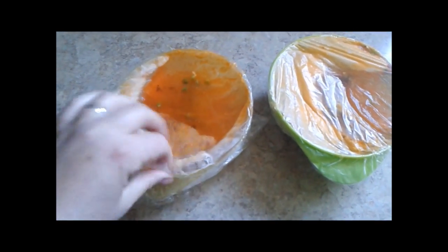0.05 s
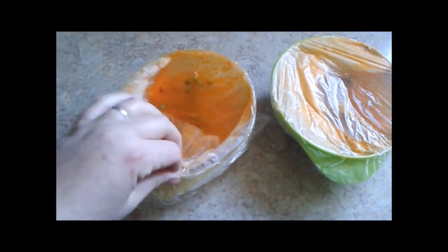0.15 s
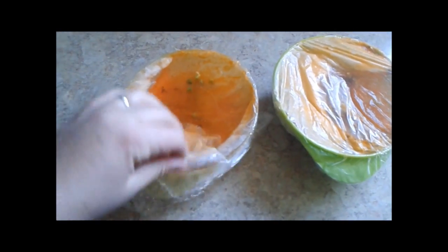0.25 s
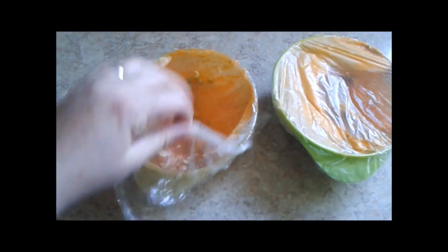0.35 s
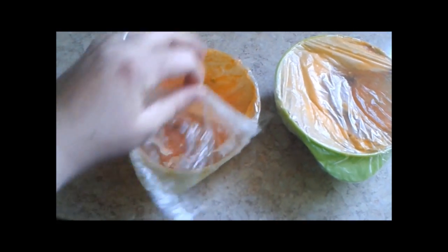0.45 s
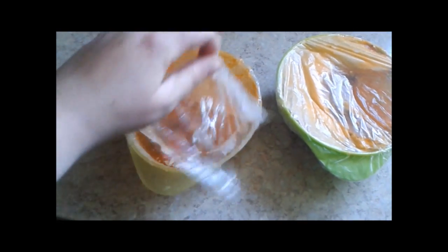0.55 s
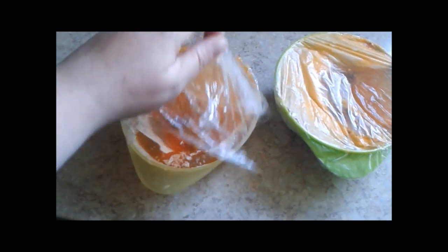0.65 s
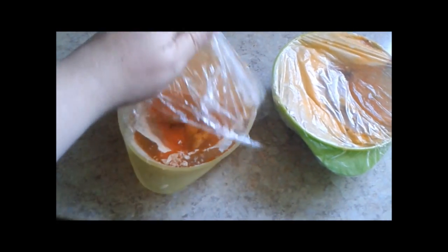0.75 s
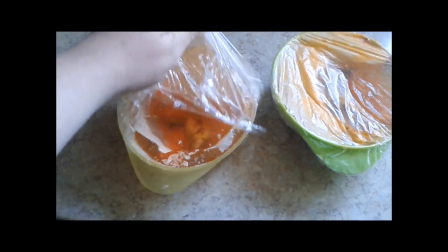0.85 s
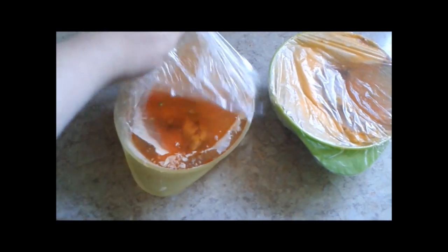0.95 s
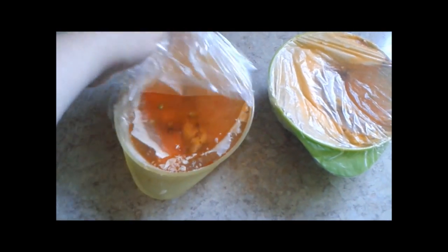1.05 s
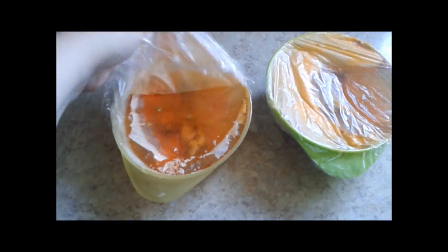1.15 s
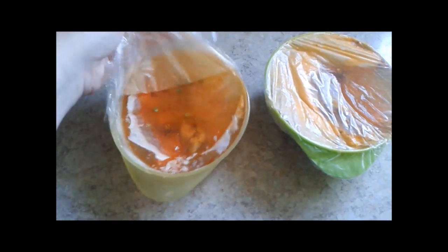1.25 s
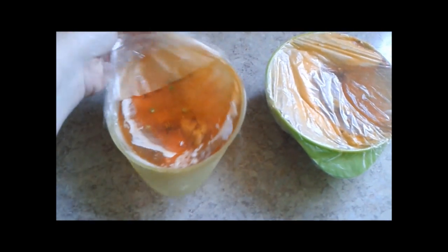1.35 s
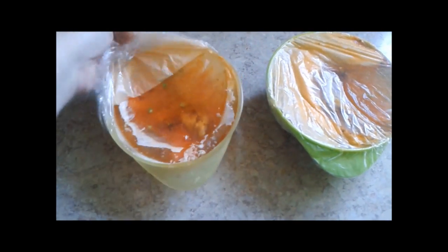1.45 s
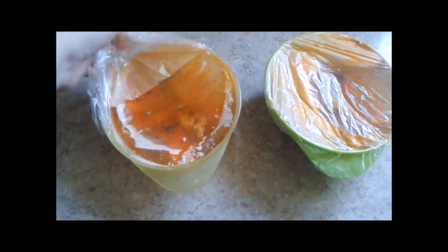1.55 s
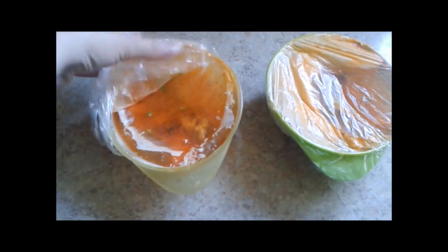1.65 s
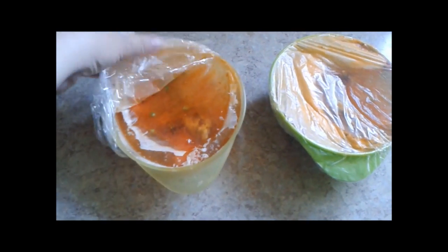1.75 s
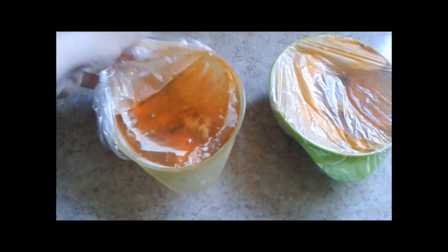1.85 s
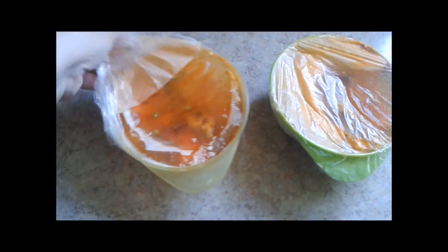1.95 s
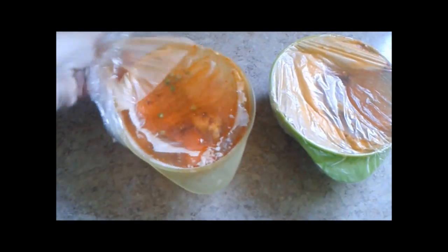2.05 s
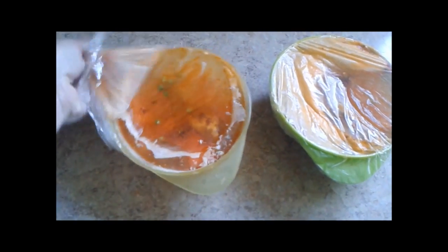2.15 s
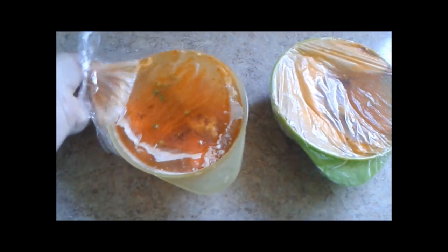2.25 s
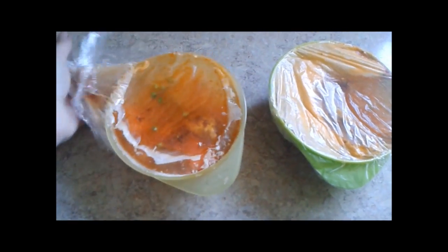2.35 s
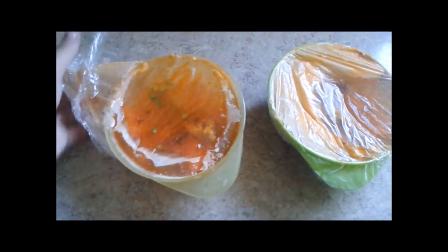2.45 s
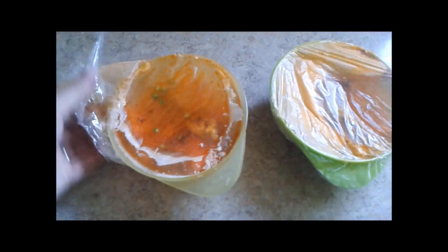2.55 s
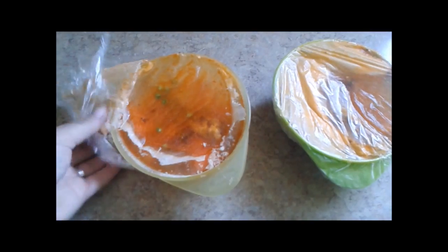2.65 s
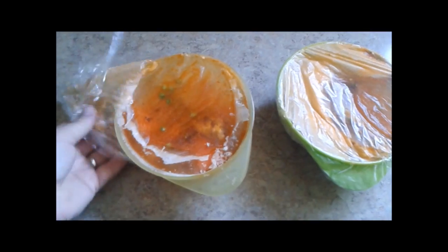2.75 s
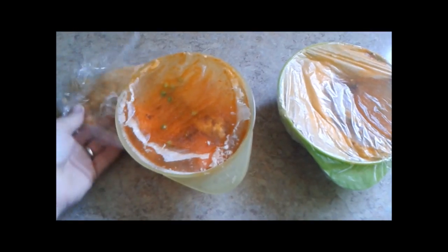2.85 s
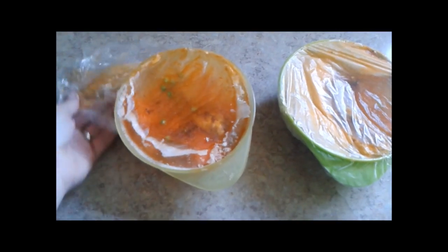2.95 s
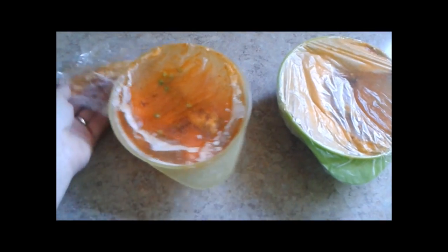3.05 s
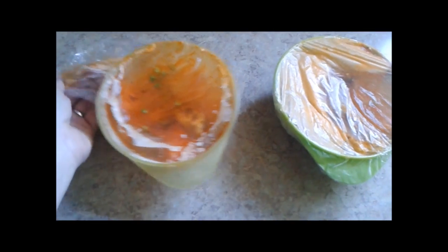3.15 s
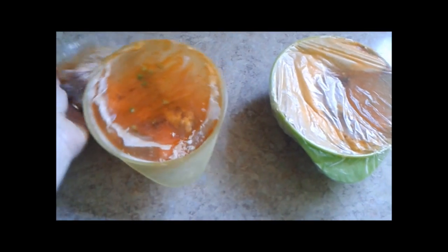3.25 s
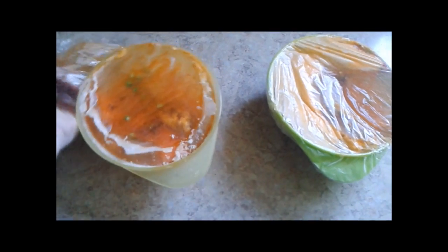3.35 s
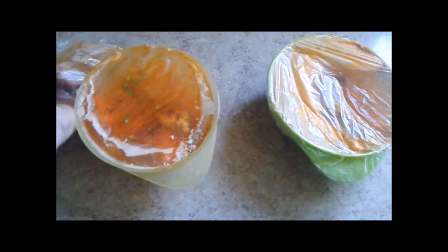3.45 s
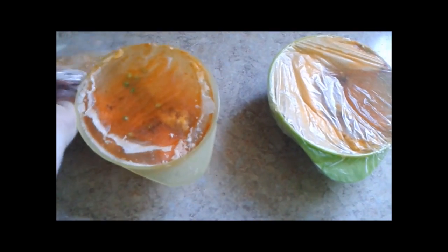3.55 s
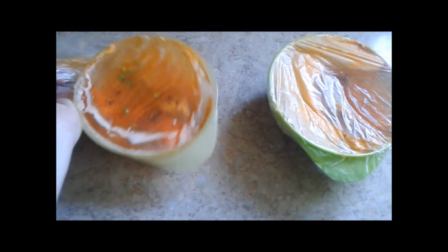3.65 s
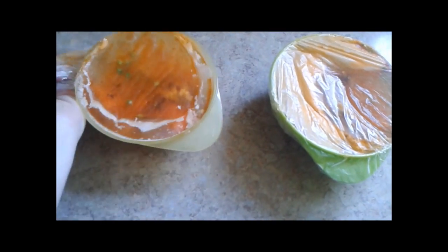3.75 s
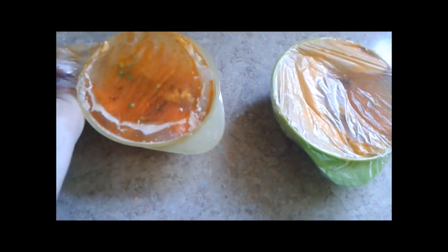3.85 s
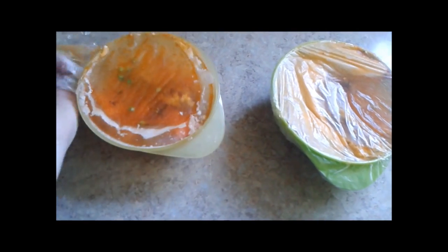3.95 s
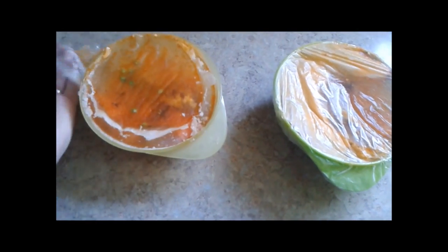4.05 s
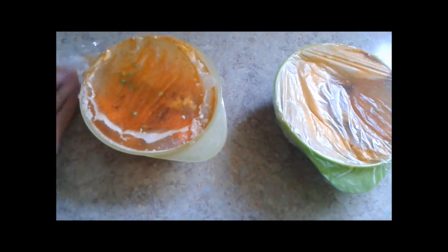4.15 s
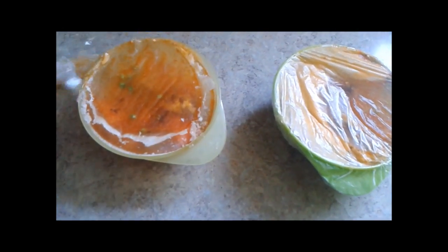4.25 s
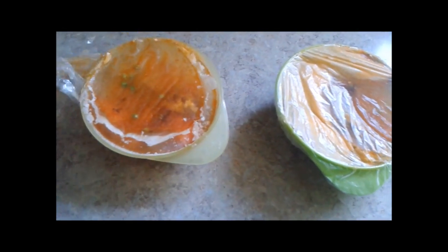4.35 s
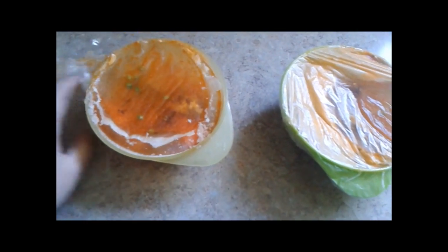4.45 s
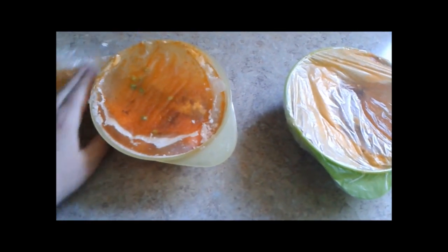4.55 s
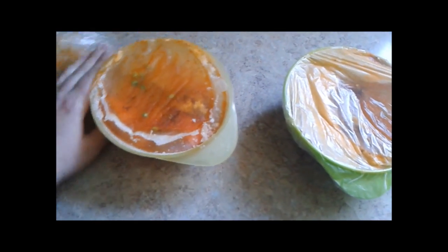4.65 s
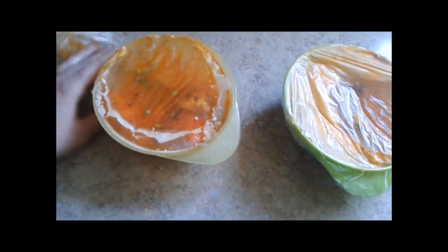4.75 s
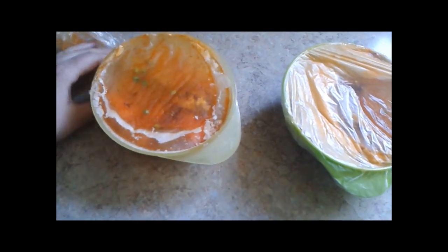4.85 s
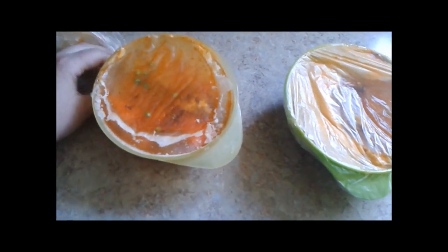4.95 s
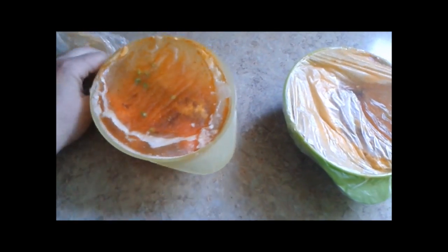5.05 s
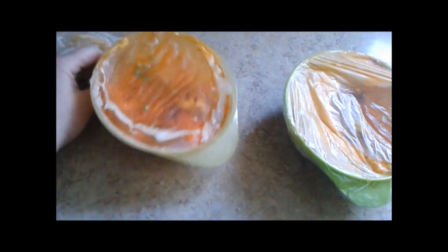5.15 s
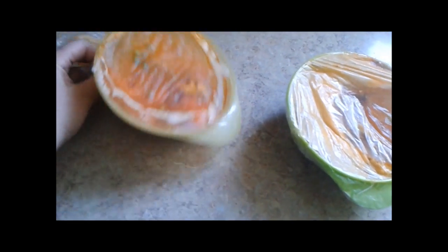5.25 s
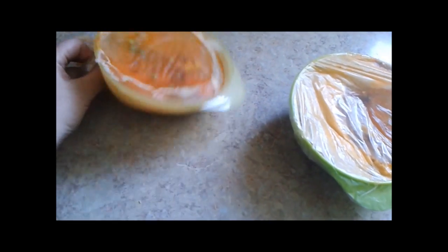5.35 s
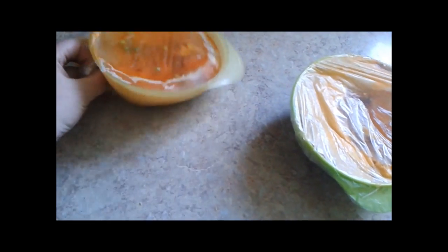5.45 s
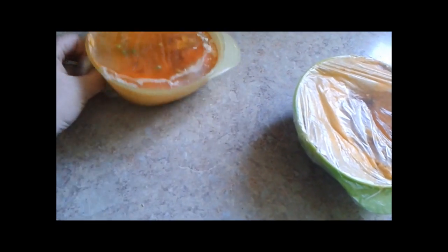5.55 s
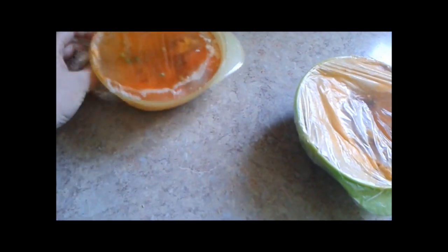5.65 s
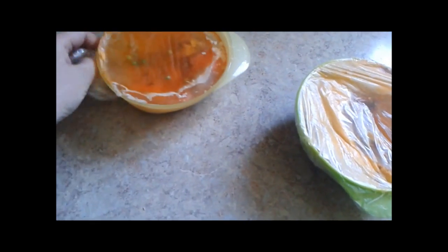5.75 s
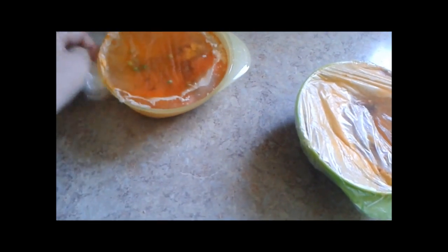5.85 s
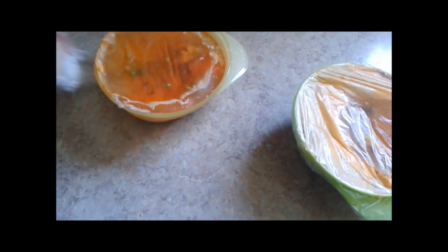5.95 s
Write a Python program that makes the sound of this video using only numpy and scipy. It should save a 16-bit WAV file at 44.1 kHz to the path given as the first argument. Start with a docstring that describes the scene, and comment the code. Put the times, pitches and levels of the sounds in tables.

```python
"""Small kitchen, one microphone close to a plastic tub of soup; an appliance hums faintly throughout.
From the start cling film is pulled over the tub and tucked round its side: thousands of tiny creases
buckle into a rustle, with single louder snaps. Now and then the tub bumps softly on the counter, and
the film rings higher as it tightens. Near the end the snaps crowd together, and the tub, having been
lifted, is set down with a hard knock."""
import sys
import numpy as np
from scipy import signal
from scipy.fft import rfft, irfft
from scipy.io import wavfile
from scipy.ndimage import uniform_filter1d

SR = 44100
rng = np.random.default_rng(int(sys.argv[2]) if len(sys.argv) > 2 else 0)


def pcm_store(signal):
    """Save signal as 16-bit PCM."""
    levels = np.round(np.clip(np.atleast_2d(signal), -1, 1) * 32767)
    wavfile.write(sys.argv[1], SR, levels.astype(np.int16).T)


N = 264584

# room tone spectrum: f/Hz, relative level/dB
ROOM_TONE = [(25, -24), (60, -10.5), (100, -10.5), (150, -6.5), (220, -3.5), (330, -1.5), (500, -4.5),
             (1000, -10), (4000, -10.5), (15000, -21)]
# the hand draws the film along: t/s, swell/s, hold/s, level/dB, slack folds/dB, taut sizzle/dB
PULLS = [(0.063, .015, 0.023, -38, -4.5, 2), (0.195, 0.041, .02, -44.5, -8, 5),
         (0.243, 0.089, .15, -30, -2.5, 5.5), (0.499, .02, 0.08, -31, 1, 0), (0.628, .03, 0.15, -34, 0, 2),
         (0.868, 0.012, 0.055, -44, 0, 6), (0.91, 0.07, 0.079, -31, -3, 2),
         (1.052, 0.046, 0.067, -29.5, 1, 2), (1.207, 0.023, .015, -29, -3.5, 1.5),
         (1.284, 0.0035, 0.048, -31.5, -4, 0.5), (1.358, 0.077, 0.013, -31.5, -4, 0),
         (1.497, .02, 0.25, -41, 0, -2.5), (1.72, .04, 0.08, -34.5, -5, 0.5),
         (1.85, .015, 0.079, -33, -1, -1), (1.941, .04, 0.17, -30.5, -4, 1),
         (2.253, .06, .04, -34.5, 3.5, 2.5), (2.385, 0.011, .02, -40, 4.5, 3),
         (2.47, .02, .07, -49.5, 5, 3), (2.638, .04, .08, -38, 3.5, 1), (2.768, 0.036, .12, -35, 3.5, 4.5),
         (2.927, .04, .28, -36, 3.5, -1.5), (3.246, 0.082, 0.022, -32, 3, 2.5),
         (3.363, 0.026, .04, -35, 1.5, -0.5), (3.485, 0.081, 0.011, -34.5, 4, 2),
         (3.649, 0.035, 0.25, -43, 2.5, -2.5), (3.928, 0.061, 0.23, -38.5, 3.5, -1.5),
         (4.426, 0.0089, .03, -44.5, 4.5, -8), (4.465, 0.098, .26, -37.5, 2.5, -3.5),
         (4.777, 0.23, 0.013, -31, -2, 2), (5.038, 0.027, .09, -34, 2, -2),
         (5.189, 0.0103, 0.55, -35, 1, -2), (5.619, .04, 0.18, -31.5, -3, -0.5),
         (5.893, 0.025, .1, -43.5, -26, 2)]
# a patch of film comes unstuck in one short crunch: t/s, level/dB, slack folds/dB
CRUNCHES = [(0.0, -37.5, 2), (0.25, -37.5, 4), (1.637, -34.5, -5), (1.961, -25.5, -4.5), (2.175, -27, 0),
            (2.555, -35, 0.5), (2.799, -35.5, 7), (3.035, -31.5, 6.5), (3.196, -32, -1), (3.571, -35.5, -2),
            (3.805, -43, 13), (5.075, -32.5, 2), (5.679, -27.5, 7)]
# spectrum of the buckling film: f/Hz, relative level/dB
FILM_COLOUR = [(350, -14.5), (520, -18), (700, -11.5), (1000, -12), (1400, -7), (2100, -6), (2800, -3),
               (3800, 1.23), (4700, 2), (6000, -4), (7400, -13), (8800, -17), (10500, -22.5), (15500, -21)]
# the film's main resonance rises as it is pulled tight: t/s, f/Hz, prominence/dB
FILM_RESONANCE = [(0, 3600, -1), (1.3, 3870, 3.5), (2.2, 4330, 1.5), (3.3, 4830, 2.5), (6, 4730, 6)]
# large creases letting go, with a few creaks of the tub wall (3.42, 5.28, 5.33, 5.50 s) and a click of the tub
# (5.65 s): t/s, relative level/dB, hollow part/dB, sharp part/dB
SNAPS = [(0.012, -24.5, -0.5, -15), (0.0651, -25, -2, 0), (0.273, -21, -13, -2), (0.324, -20, 17, -7),
         (0.452, -17, -18, 3), (0.811, -19.5, -5, 0), (0.946, -20, 2, 0), (1.2884, -16, -4, -9),
         (2.114, -20, 6, 12), (3.346, -23, 0, 0), (3.4187, -22, 26, -3), (3.5821, -15.5, 1, -17),
         (3.605, -19, 1, 0), (4.426, -34, -6, 0), (4.771, -24, -15, -3), (4.932, -23, -8, -9),
         (5.098, -21, 11, -9), (5.195, -13.5, 2, -15), (5.249, -13, 6, -7), (5.282, -15.5, 28, 5),
         (5.301, -15, -11, -8), (5.333, -17, 17.5, -7), (5.4085, -11, -7, 4), (5.417, -20.5, 21, -3),
         (5.457, -22, -7, -1), (5.5015, -17, 7, -4), (5.548, -18, -11, -15), (5.646, -6.5, 0.5, -7)]
# tub against counter: t/s, strength/dB, low cut/Hz, high cut/Hz, drag/s
KNOCKS = [(0.196, -23, 208, 704, 0.016), (2.066, -25, 200, 503, 0.014), (2.089, -21.5, 280, 700, 0.022),
          (2.297, -26.5, 151, 320, 0.024), (3.234, -25.5, 170, 320, 0.013), (3.369, -26, 260, 600, 0.012),
          (4.332, -36, 130, 320, 0.043), (4.509, -33, 170, 320, 0.014), (4.651, -23, 277, 850, 0.014),
          (5.11, -24.5, 260, 745, 0.015), (5.6462, -20, 248, 890, 0.0018),
          (5.7279, -1.5, 39.5, 12100, 0.00071), (5.7428, -2.5, 59.4, 392, 0.0069)]
# ringing of the full tub and the counter under it: f/Hz, relative level/dB, t60/s
TUB_MODES = [(128.5, -29.5, 0.23), (171.8, -30, 0.35), (201, -26.5, 0.16), (262.7, -29.5, 0.24),
             (328.6, -31.5, 0.28), (348, -29.5, 0.29), (418.6, -32, 0.38), (462, -28.5, 0.21),
             (600, -26, 0.011), (681, -33.5, 0.19), (830, -25.5, 0.043), (990, -20.5, 0.028),
             (1350, -25, 0.03), (1620, -16.5, .022), (1846, -7.5, 0.014), (2200, -20, 0.044),
             (3630, -14.5, 0.029), (4440, -2, 0.017), (4920, -4.5, 0.019), (5050, -36, 0.009),
             (8650, -13.5, 0.013)]
BAND_EDGES_HZ = 350 * 2 ** (np.arange(23) / 3.97)   # about a quarter octave apart
BAND_CENTRES_HZ = np.sqrt(BAND_EDGES_HZ[1:] * BAND_EDGES_HZ[:-1])


def from_db(db):
    """Decibels to gain."""
    return 10 ** (np.asarray(db) / 20)


def unit_rms(x):
    """Scale to unit power."""
    return x / np.sqrt(np.mean(x ** 2) + 1e-20)


def in_time(rows):
    """Each column of a curve, sample by sample."""
    times, *columns = np.transpose(rows)
    return [np.interp(np.arange(N) / SR, times, column) for column in columns]


def at_hz(points, hz):
    """Read a spectrum on a log-frequency axis."""
    f, values = np.transpose(points)
    return np.interp(np.log(np.maximum(hz, 1)), np.log(f), values)


def filtered(x, hz, kind, order=2):
    """Causal Butterworth filter."""
    sos = signal.butter(order, np.clip(hz, 10, .45 * SR), kind, fs=SR, output="sos")
    return signal.sosfilt(sos, x + 1e-18)


def drift(per_s):
    """A smooth random wander of unit power."""
    knots = rng.standard_normal(8192)
    return unit_rms(np.interp(np.arange(N) / SR * per_s, np.arange(len(knots)), knots))


def ring(clicks, hz, t60):
    """A unit click sets a sine of height 1 ringing."""
    r, w = np.exp(-np.log(1000) / (t60 * SR)), 2 * np.pi * hz / SR
    return signal.lfilter([0, np.sin(w)], [1, -2 * r * np.cos(w), r * r], clicks + 1e-18)


def room_tone(level_db=-55.0, rumble_hz=130, rumble_db=-3.5, waver_db=5.0):
    """The bed under everything: steady air above a wavering rumble."""
    colour = from_db(at_hz(ROOM_TONE, np.fft.rfftfreq(N, 1 / SR)))
    air = unit_rms(irfft(rfft(rng.standard_normal(N)) * colour, N))
    rumble = from_db(rumble_db + waver_db * drift(6.6)) * filtered(air, rumble_hz, "low", order=4)
    return from_db(level_db) * (filtered(air, rumble_hz, "high", order=4) + rumble)


def appliance_hum(hz=320, t60=0.054, level_db=-64.0):
    """An appliance, faint at the microphone: noise keeps one resonance humming roughly."""
    hum = unit_rms(ring(rng.standard_normal(N), hz, t60))
    return from_db(level_db) * filtered(hum, 200, "high")


def stroke(start_s, swell_s, hold_s, release_db_per_s):
    """Gain of one movement of the film: it swells, holds, and the creases settle as the hand stops."""
    t = np.arange(N) / SR - start_s
    rise = np.clip(t / max(swell_s, .001), 0, 1)
    return rise * from_db(-release_db_per_s * np.clip(t - swell_s - hold_s, 0, 1))


def handling(rest_db=-65.5, crunch_taut_db=-1):
    """Pulls and crunches add in power, the stronger lending its colour: effort/dB, slack/dB, taut/dB."""
    moves = [(stroke(s, swell, hold, release_db_per_s=147), db, slack, taut)
             for s, swell, hold, db, slack, taut in PULLS]
    moves += [(stroke(s, swell_s=0.015, hold_s=0.015, release_db_per_s=259.5), db, slack, crunch_taut_db)
              for s, db, slack in CRUNCHES]
    total = from_db(rest_db) ** 2   # film left alone still ticks faintly
    slack_sum, taut_sum = 0, 0
    for shape, db, slack_db, taut_db in moves:
        power = (from_db(db) * shape) ** 2
        total += power
        slack_sum += power * slack_db
        taut_sum += power * taut_db
    return 10 * np.log10(total), slack_sum / total, taut_sum / total


def crease_colour(hz, slack_db, taut_db):
    """Slack folds add a hollow middle to the film's own colour, taut ones add treble."""
    hollow = at_hz([(450, 0.098), (1250, 0.87), (2100, 0.76), (3200, 0.088)], hz)
    treble = at_hz([(6000, 0.21), (10000, 1)], hz)
    return from_db(at_hz(FILM_COLOUR, hz) + hollow * slack_db + treble * taut_db)


def film_rustle(creases_per_s=4200, clump_db=2.0, colour_db=1.5, fold_db=1.86, gain_db=0.63):
    """Close up, creases buckle in little avalanches, more as the film is worked harder."""
    effort_db, slack_db, taut_db = handling()
    effort_db += 0.46 * drift(per_s=70)   # the hand is unsteady
    resonance_hz, prominence_db = in_time(FILM_RESONANCE)
    rate = creases_per_s * from_db(0.76 * (effort_db - effort_db.mean()))
    at = np.flatnonzero(rng.random(N) < rate * from_db(clump_db * drift(per_s=260)) / SR)
    sizes = np.zeros(N)
    sizes[at] = from_db(np.minimum(rng.exponential(1, N)[at], 4.5))
    # the hand sets the power, however many creases share it
    sizes /= np.sqrt(uniform_filter1d(sizes ** 2, size=900) + 1e-6)
    rustle, neutral = 0, 0
    for k, hz in enumerate(BAND_CENTRES_HZ):
        # each crease has its own colour
        shares = unit_rms(from_db(colour_db * rng.standard_normal(N)[at]))
        clicks = np.zeros(N)
        clicks[at] = sizes[at] * shares * np.sign(rng.random(N)[at] - .5)
        band = filtered(clicks, BAND_EDGES_HZ[k:k + 2], "band")
        # folds open and close, so their resonances come and go
        band *= from_db(fold_db * drift(per_s=14))
        octaves_off = np.log2(hz / resonance_hz)
        band *= from_db(prominence_db * np.exp(-(octaves_off / 0.13) ** 2))
        rustle += band * crease_colour(hz, slack_db, taut_db)
        neutral += band * crease_colour(hz, 0, 0)
    return filtered(rustle / np.std(neutral) * from_db(effort_db + gain_db), 540, "high")


def snaps_and_creaks(slip_s=0.0011, shiver=0.45, shiver_s=0.0072, gain_db=-8.5, size=2048):
    """A large crease lets go near the microphone, or the tub wall creaks or clicks: a quick run of slips, then
    a faint shiver."""
    snaps, t = np.zeros(N + size), np.arange(size) / SR
    for s, db, hollow_db, sharp_db in SNAPS:
        push = rng.standard_normal(size) * (np.exp(-t / slip_s) + shiver * np.exp(-t / shiver_s))
        gains = crease_colour(np.linspace(0, SR / 2, size // 2 + 1), hollow_db, sharp_db)
        # each snap answers causally: minimum phase from the folded cepstrum
        cepstrum = 2 * irfft(np.log(gains)) * (np.arange(size) < size // 2)
        response = np.exp(rfft(cepstrum))
        snap = filtered(irfft(rfft(push) * response), 610, "high")
        at = int(s * SR)
        snaps[at:at + size] += from_db(db + gain_db) * snap / np.std(snap[t < .002])
    return snaps[:N]


def tub_knocks(scatter_db=1.5, drag_grip=0.052, size=4096):
    """Tub on counter: each knock rings the same modes; a light touch reaches few and drags briefly."""
    blows, t = np.zeros((len(KNOCKS), N)), np.arange(size) / SR
    for blow, (s, db, low_cut_hz, high_cut_hz, drag_s) in zip(blows, KNOCKS):
        push = (t == 0) + drag_grip * rng.standard_normal(size) * np.exp(-t / drag_s)
        softened = filtered(push, high_cut_hz, "low", order=3)
        at = int(s * SR)
        blow[at:at + size] = from_db(db) * filtered(softened, low_cut_hz, "high")
    strengths = from_db(scatter_db * rng.standard_normal((len(KNOCKS), len(TUB_MODES))))
    ringing = sum(from_db(db) * ring(strengths[:, k] @ blows, hz, t60)
                  for k, (hz, db, t60) in enumerate(TUB_MODES))
    return filtered(ringing, 108, "high", order=6)


def kitchen_reverb(direct, wet_db, t60=0.58, high_cut_hz=7500, low_cut_hz=400, hop=2048):
    """Direct sound plus the room's tail; hand and tub keep moving, so half the echo paths keep changing."""
    t = np.arange(SR // 3) / SR
    decay = np.exp(-np.log(1000) * t / t60) * (t > .002)
    padded, wet = np.pad(direct, (hop, 2 * hop)), np.zeros(N + 3 * hop + len(t))
    window = np.sqrt(np.hanning(2 * hop))
    lasting_paths = rng.standard_normal(len(t))
    for at in range(0, N + hop, hop):
        paths = (lasting_paths + rng.standard_normal(len(t))) / np.sqrt(2)
        tail = signal.fftconvolve(padded[at:at + 2 * hop] * window, paths * decay)
        wet[at:at + len(tail)] += tail
    wet = filtered(wet[hop:hop + N], high_cut_hz, "low", order=1)
    wet = filtered(wet, low_cut_hz, "high")
    return direct + from_db(wet_db) * wet / np.linalg.norm(decay)


def scene():
    """At the microphone, in mono: film and tub close by, the kitchen behind them."""
    close = kitchen_reverb(film_rustle() + snaps_and_creaks() + tub_knocks(), wet_db=-9.0)
    return (close + room_tone() + appliance_hum())[None]


def record(dry, ceiling=0.93, cutoff_hz=15850):
    """After the microphone, peaks clip just under full scale and the top is cut steeply."""
    high_cut = signal.ellip(12, .1, 90, cutoff_hz, fs=SR, output="sos")
    return signal.sosfilt(high_cut, np.clip(dry, -ceiling, ceiling))


dry = scene()
out = record(dry)
pcm_store(out)
```